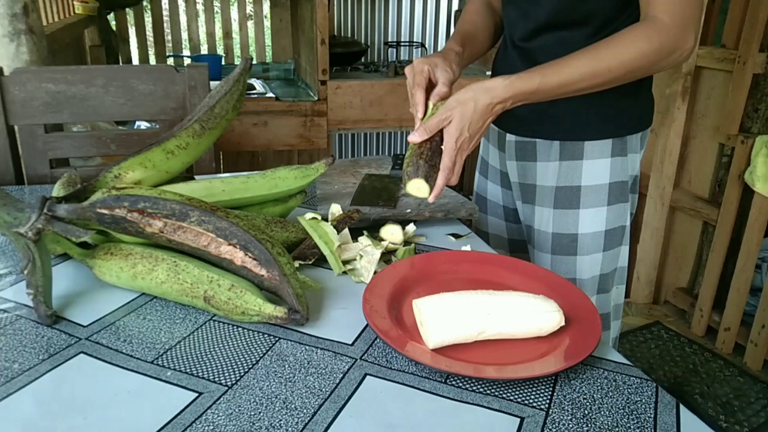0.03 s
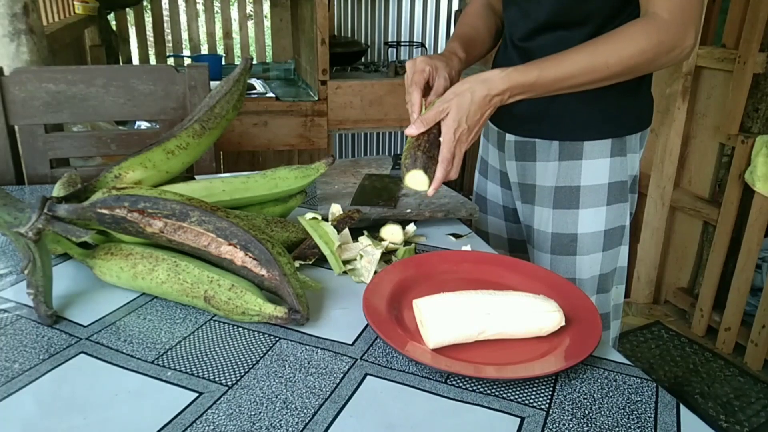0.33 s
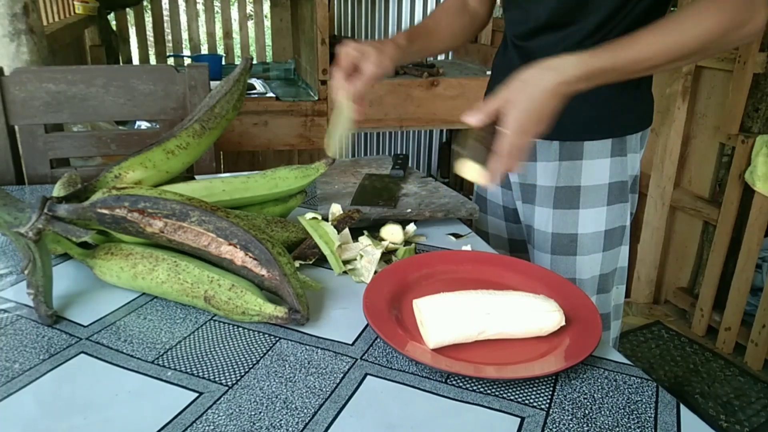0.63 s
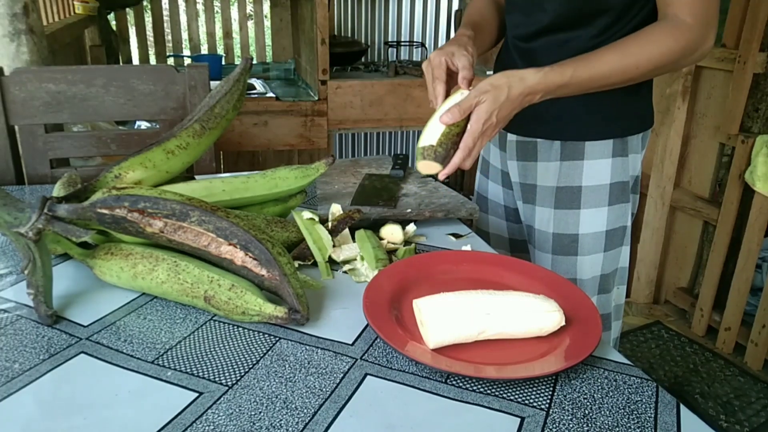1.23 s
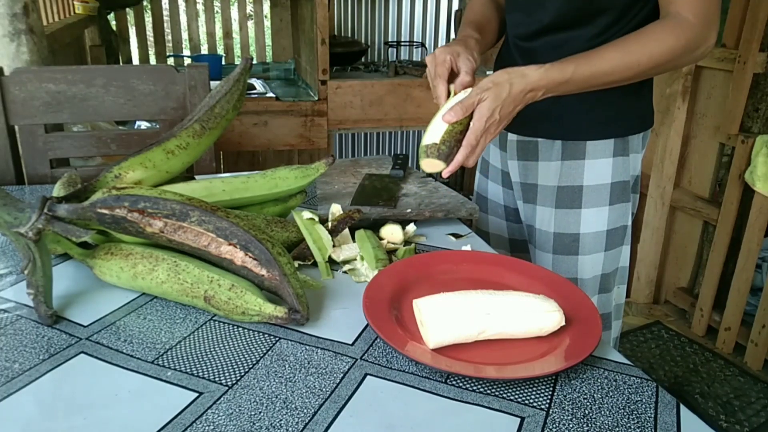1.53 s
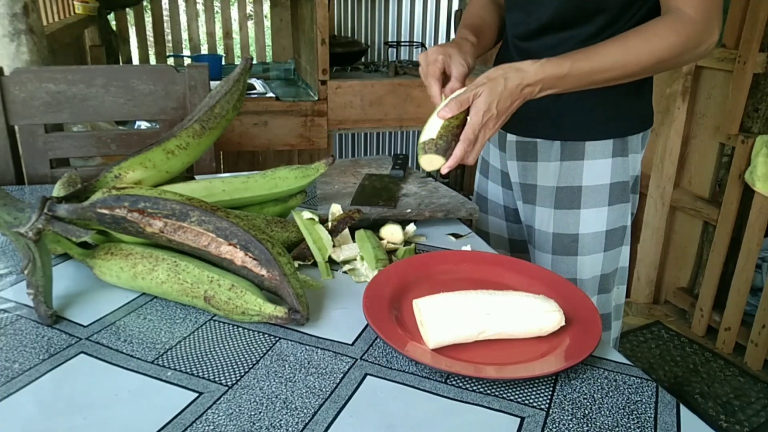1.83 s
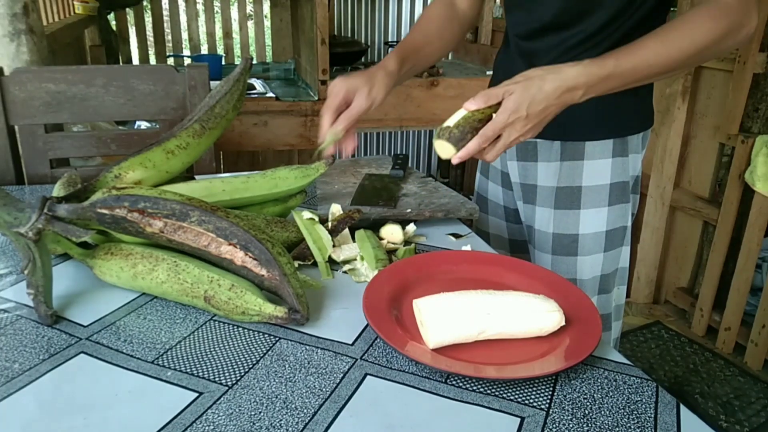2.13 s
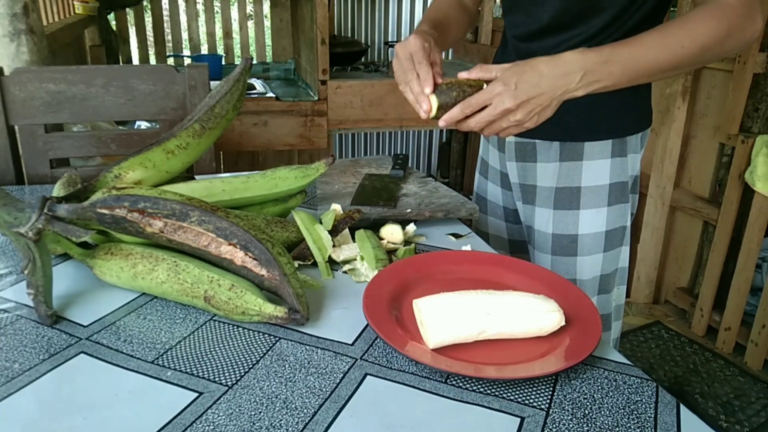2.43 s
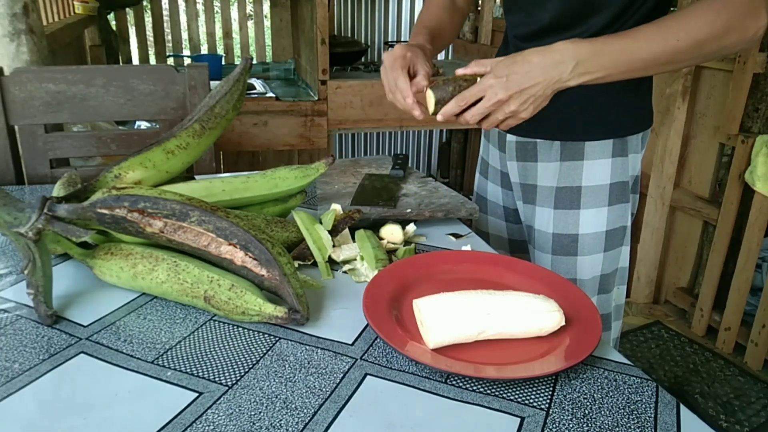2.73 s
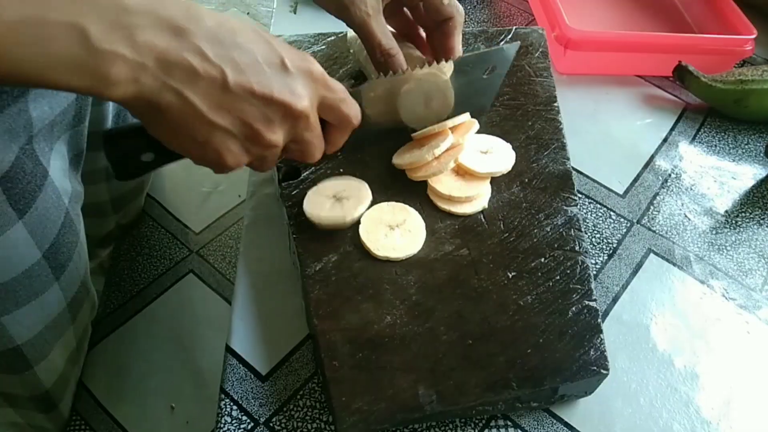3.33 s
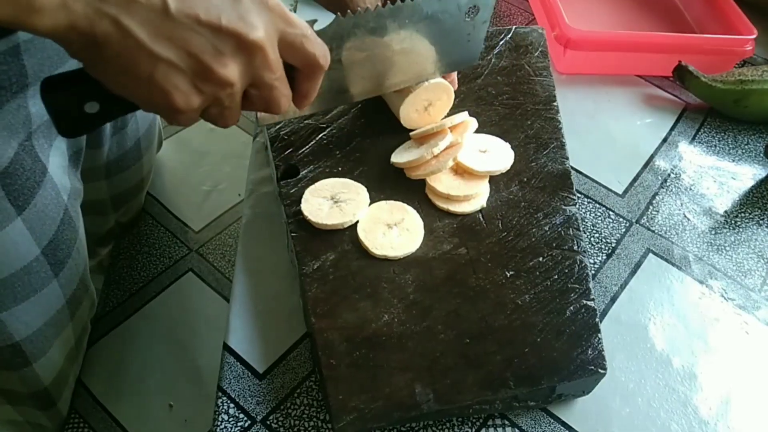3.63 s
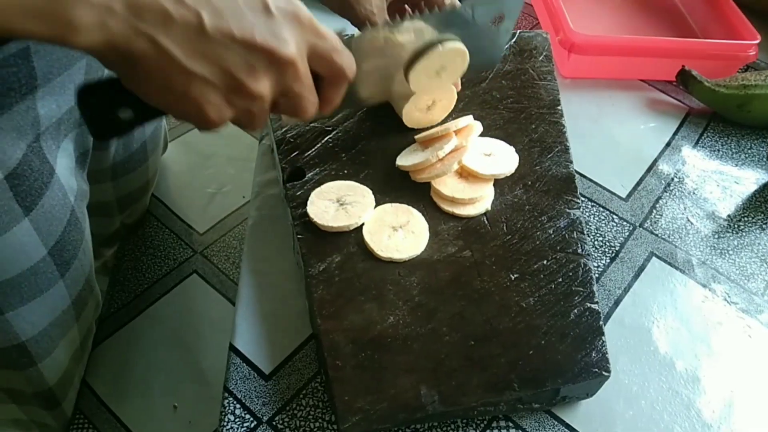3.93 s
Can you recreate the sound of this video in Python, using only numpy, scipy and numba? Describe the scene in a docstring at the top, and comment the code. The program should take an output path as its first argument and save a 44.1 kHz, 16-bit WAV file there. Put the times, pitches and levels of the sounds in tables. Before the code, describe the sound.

Plantain peel tearing off with a crackle, then two sharp knife knocks on a wooden board.

```python
"""Peeling and slicing a green plantain

At a table under an open shelter, hands tear off two strips of peel: fibres part in a dense crackle,
bundles snap, and the peel drops on the table. A cleaver then hisses through the fruit twice and
knocks on a wooden board, ringing its modes. Insects ring and small birds call in the trees around."""
import sys
import numpy as np
from scipy import signal
from scipy.fft import rfft, irfft
from scipy.io import wavfile
from scipy.ndimage import uniform_filter1d, minimum_filter1d
from numba import njit

SR = 44100
rng = np.random.default_rng(int(sys.argv[2]) if len(sys.argv) > 2 else 0)


def output_pcm(signal):
    """Save a mono or channel-first signal as 16-bit PCM at the path in sys.argv[1].

    Samples are clipped to [-1, 1] before scaling.
    """
    pcm = np.clip(np.atleast_2d(signal).T, -1, 1) * 32767
    wavfile.write(sys.argv[1], SR, np.round(pcm).astype(np.int16))


N = 176400
T = np.arange(N) / SR
ROOM_T60_S = .19


def peeling():
    """Fibres crackle apart, duller while the skin only strains; now and then a whole bundle snaps."""
    # per strip, rows of: t/s, level/dB, low edge/Hz, top edge/Hz
    tears = [
        [(.25, -64, 6300, 7500), (.39, -49.5, 5150, 7700), (.456, -51, 4600, 8700), (.475, -42.5, 1700, 15200),
         (.56, -43.5, 1100, 15200), (.65, -44.5, 780, 14900), (.667, -34.5, 520, 15900), (.68, -38, 320, 15000),
         (.70, -56, 397, 13900)],
        [(1.82, -64, 5960, 8900), (1.88, -51, 3150, 9100), (1.925, -44.5, 1940, 12700), (1.95, -43, 840, 15000),
         (2.02, -39.5, 480, 15000), (2.05, -75, 604, 12900), (2.10, -44, 620, 10900), (2.14, -54, 746, 10800),
         (2.165, -63, 800, 11000)],
    ]
    # snapping bundles: t/s, level/dB, rise and fade/s, low edge/Hz
    snaps = [(.331, -42, 0.00078, 5200), (0.567, -28, 0.00082, 2500), (0.615, -30, 0.0014, 2070),
             (0.647, -37, 0.0013, 705), (1.523, -27.5, 0.0047, 2880), (1.534, -37, 0.0096, 543),
             (1.911, -32, 0.00083, 3770), (1.946, -29, 0.0009, 2450), (1.957, -27, 0.00042, 2000),
             (2.075, -35.5, 0.0018, 1770), (2.146, -31, 0.0023, 970), (2.7361, -27.5, 0.0011, 4440),
             (2.746, -35.5, 0.011, 4170), (3.168, -54, .002, 3030), (3.236, -50.5, 0.0008, 2980),
             (3.297, -32, 0.0017, 2980)]
    # fibre spectrum: f/Hz, level/dB
    fibre_eq = [(200, -12), (1100, -4.5), (1600, -9.5), (2600, -6), (4000, -1.5), (5200, -2.5), (6500, 0),
                (8100, 7), (9500, -4), (12000, -12.5), (16000, -21.5)]
    out = np.zeros(N)
    for tear in tears:
        times_s, *columns = np.array(tear).T
        db, low_hz, top_hz = (np.interp(T, times_s, column) for column in columns)
        tearing = (T > times_s[0]) & (T < times_s[-1])
        crackle = ruptures(per_s=3900, spread_db=1.5) * undb(db) * tearing
        clump_db = 3 * band(45, 90)
        crackle = lowpass(lowpass(crackle * undb(clump_db), top_hz), top_hz)
        out += flap(crackle, low_hz)
    burst = lowpass(ruptures(per_s=20000, spread_db=1.6), 12500)
    for at_s, db, half_s, low_hz in snaps:
        out += flap(burst * undb(db) * swell(at_s, half_s, half_s), low_hz)
    return colour(out, fibre_eq)


def flap(x, edge_hz):
    """Loose peel radiates only above an edge; the longer the flap, the lower the edge."""
    for _ in range(3):
        x = highpass(x, edge_hz)
    return x


def cleaver():
    """Two strokes: the blade hisses through the flesh ever faster, then hits the board."""
    # strokes: t/s, ring level/dB, slicing time/s, slicing level/dB, contact/s, room/dB
    strokes = [(3.3214, -4, 0.051, -37, 0.00013, -5.5), (3.8543, -3, 0.09, -36.5, 0.00016, -13)]
    # slicing spectrum: f/Hz, level/dB
    slice_eq = [(60, 6), (200, 3.5), (420, -7.5), (700, -16), (1400, -3.5), (2500, -5.5), (4000, 0.5),
                (5500, -1), (7500, -4), (9800, -1), (11500, -21), (16000, -25)]
    rise_db = 19
    out = np.zeros(N)
    for at_s, ring_db, slice_s, slice_db, contact_s, room_db in strokes:
        knock = board_knock(at_s, ring_db, contact_s)
        uncut = np.clip((at_s - T) / slice_s, 0, 1)
        envelope = undb(slice_db - rise_db * uncut ** 2) * (uncut > 0) * (uncut < 1)
        hiss = colour(ruptures(per_s=9000, spread_db=5.5) * envelope, slice_eq)
        direct = knock + hiss
        out += direct + undb(room_db) * echoes(direct, ROOM_T60_S, damp_hz=3200)
    return out


def board_knock(at_s, ring_db, contact_s):
    """The blade cracks on the wood and both ring; longer contact dulls the knock."""
    # modes of board and blade: f/Hz
    modes_hz = [187, 349, 430, 844, 963, 1022, 1250, 1466, 1686, 2019, 2221, 2351, 2474, 2620, 2734, 3160,
                5250]
    # per mode: level/dB
    modes_db = [-16.5, -11.5, -14, -21.5, -13.5, -12.5, -16.5, -9, -14, -8.5, -16, -12, -6.5, -10.5, 2.5,
                -9, -5]
    # per mode: t60/s
    modes_t60_s = [.08, .075, .075, .07, .115, .1, .025, .055, .055, .04, .08, .08, .065, .05, .034, .03,
                   .007]
    crack_fade_s = .0036
    age_s = np.maximum(T - at_s, 0)
    ring = -sum(undb(db - 60 * age_s / t60_s) * np.cos(2 * np.pi * hz * age_s)
                for hz, db, t60_s in zip(modes_hz, modes_db, modes_t60_s)) * (T > at_s)
    # impact spectrum: f/Hz, level/dB
    crack_eq = [(100, -26), (700, -29), (1200, -1.5), (2700, 1), (3700, -6), (4500, -9), (5600, -4.5),
                (6500, -17.5), (8000, -10.5), (11000, -19.5), (16000, -25)]
    crack = colour(noise() * np.exp(-age_s / crack_fade_s) * (T > at_s), crack_eq)
    pole = np.exp(-2 / (contact_s * SR))
    knock = signal.lfilter([1 - pole], [1, -pole], undb(ring_db) * ring + crack)
    return lowpass(highpass(knock, 120), 12200)


def rubs():
    """Fingers scuff the peel: a hiss, a hollow body and a dull thud."""
    # scuffs: t/s, rise/s, fade/s, hiss/dB, body/dB, thud/dB
    scuffs = [(0.051, 0.0024, 0.019, -56, -79, -87), (0.9738, 0.0015, 0.024, -40.5, -58, -39.5),
              (2.478, 0.0018, 0.036, -67, -73, -78), (2.653, 0.0023, 0.021, -49.5, -46.5, -64),
              (2.675, 0.007, 0.032, -55, -50, -47.5), (3.043, 0.0039, .03, -69, -83, -57),
              (3.159, 0.003, .018, -43, -47, -43), (3.241, 0.01, 0.02, -63.5, -66, -51.5)]
    # hiss spectrum: f/Hz, level/dB
    hiss_eq = [(200, -20.5), (1200, -20.5), (2000, -4.5), (3200, -2.5), (5000, 4), (7500, 0.5),
               (10000, -11.5), (16000, -43)]
    # hollow body spectrum: f/Hz, level/dB
    body_eq = [(100, -17), (350, -1.5), (750, 1.5), (1300, -3.5), (2100, -12), (3200, -17.5), (8000, -46)]
    # thud spectrum: f/Hz, level/dB
    thud_eq = [(30, -33.5), (100, -4.5), (180, 2.5), (350, -15.5), (700, -25.5), (1500, -43), (5000, -64)]
    hiss_gain, body_gain, thud_gain = sum(undb(row[3:])[:, None] * swell(*row[:3]) for row in scuffs)
    hiss = colour(hiss_gain * ruptures(per_s=4700, spread_db=2.5), hiss_eq)
    body = colour(body_gain * ruptures(per_s=2900, spread_db=1.8), body_eq)
    return hiss + body + colour(thud_gain * noise(), thud_eq)


def bumps():
    """Peel and fruit bump softly, each time one damped tone of unsteady pitch."""
    # bumps: t/s, level/dB, f/Hz, t60/s, relative pitch wobble
    hits = [(.11, -60.5, 400, 0.094, 0.06), (0.973, -38.5, 356, 0.11, 0), (0.99, -36, 135, 0.29, 0.07),
            (.976, -34.5, 218, 0.11, 0.08), (2.32, -67.5, 184.3, 0.5, 0.37), (3.04, -49.5, 200, 0.16, 0.08),
            (2.471, -51.5, 838, 0.17, 0.16), (2.483, -57.5, 920, 0.26, 0.1)]
    rise_s = .0056
    out, wobble = np.zeros(N), band(73, 110)
    for at_s, db, hz, t60_s, depth in hits:
        age_s = np.maximum(T - at_s, 0)
        phase = 2 * np.pi * np.cumsum(hz * (1 + depth * wobble) * (T > at_s)) / SR
        envelope = undb(db - 60 * age_s / t60_s) * (1 - np.exp(-age_s / rise_s))
        out += envelope * np.sin(phase)
    return out


def hand_rumble():
    """Low rumble of hands at the board."""
    # envelope: t/s, level/dB
    levels = [(2.9, -100), (3.15, -71.5), (3.4, -56.5), (3.65, -66.5), (4.0, -57)]
    # rumble spectrum: f/Hz, level/dB
    rumble_eq = [(25, -16.5), (90, -1.5), (180, -2.5), (400, -11), (700, -24), (1500, -38.5), (5000, -43.5)]
    return colour(noise(), rumble_eq) * undb(np.interp(T, *np.array(levels).T))


def birds():
    """Near-level whistles and trilled glides, smeared by the trees."""
    # notes: t/s, length/s, start f/Hz, end f/Hz, level/dB
    notes = [(1.218, 0.062, 4600, 7000, -71), (1.265, 0.074, 7100, 4700, -55.5),
             (1.365, 0.022, 4300, 4900, -49), (1.379, 0.036, 6600, 4400, -51),
             (1.661, 0.032, 5600, 5550, -64), (1.751, 0.066, 4400, 6700, -55.5),
             (2.236, 0.095, 7600, 7250, -65), (2.602, 0.034, 2800, 2850, -65),
             (2.781, 0.18, 2936, 2474, -70), (2.802, 0.055, 4700, 5150, -58),
             (2.989, 0.048, 5700, 5950, -57), (3.002, .28, 2420, 2150, -72),
             (3.088, 0.035, 5500, 5000, -52.5), (3.484, 0.021, 2400, 2900, -51.5),
             (3.508, 0.13, 3900, 6700, -59), (3.55, 0.068, 4280, 5660, -65),
             (3.677, 0.08, 4950, 5050, -60.5), (3.921, 0.023, 5100, 5100, -44.5)]
    glide_share, pitch_share = .1, .012  # trill depths
    calls, trill = np.zeros(N), band(130, 150)
    for at_s, length_s, start_hz, end_hz, db in notes:
        on = (T >= at_s) & (T < at_s + length_s)
        progress = (T[on] - at_s) / length_s
        glide_hz = start_hz + (end_hz - start_hz) * (progress + glide_share * trill[on])
        hz = glide_hz * (1 + pitch_share * trill[on])
        envelope = undb(db) * np.sqrt(np.abs(np.sin(np.pi * progress)))
        calls[on] += envelope * np.sin(2 * np.pi * np.cumsum(hz) / SR)
    return undb(-4) * calls + undb(4.5) * echoes(calls, t60_s=.32, damp_hz=12000)


def insects():
    """A fluttering chorus in narrow bands, fainter from the first knock on."""
    # chorus bands: f/Hz, width/Hz, level/dB
    bands = [(7455, 140, -81), (7930, 110, -71.5), (8625, 170, -71.5), (8840, 120, -67), (11460, 180, -83)]
    drop_at_s, drop_db = 3.33, 10.5
    chorus = sum(undb(db) * band(hz, width_hz) for hz, width_hz, db in bands)
    flutter_db = 2 * band(9.1, 32)
    return chorus * undb(flutter_db - drop_db * (T > drop_at_s))


def air():
    """Faint, steady outdoor noise."""
    # air spectrum: f/Hz, level/dB
    air_eq = [(25, -7.5), (90, -0.5), (200, -8.5), (400, -15.5), (1000, -18.5), (3000, -24), (6000, -23.5),
              (10000, -30), (16000, -39.5)]
    return undb(-81) * colour(noise(), air_eq)


def echoes(x, t60_s, damp_hz, gap_s=.0035):
    """Diffuse reflections after a short gap."""
    t = T[:SR]
    tail = noise()[:SR] * undb(-60 * t / t60_s) * (t > gap_s)
    damping = signal.butter(1, damp_hz, fs=SR, output="sos")
    return signal.fftconvolve(x, signal.sosfilt(damping, tail / np.linalg.norm(tail)))[:N]


def ruptures(per_s, spread_db):
    """Tiny random clicks of uneven size, rms 1."""
    size = undb(spread_db * np.minimum(rng.exponential(size=N), 5))
    return unit((rng.random(N) < per_s / SR) * size * np.sign(noise()))


def swell(at_s, rise_s, fade_s):
    """Exponential rise to a moment and fade after it."""
    return np.exp(-np.maximum((at_s - T) / rise_s, (T - at_s) / fade_s))


def band(hz, width_hz):
    """Noise around one frequency, rms 1."""
    f = np.fft.rfftfreq(N, 1 / SR)
    return unit(irfft(rfft(noise()) * np.exp(-2 * ((f - hz) / width_hz) ** 2), N))


def colour(x, points):
    """Minimum-phase filter through (f/Hz, level/dB) points; keeps the power of white noise."""
    hz, db = np.array(points).T
    f = np.fft.rfftfreq(4096, 1 / SR)
    gain = undb(np.interp(np.log(f + 1), np.log(hz), db))
    cepstrum = irfft(np.log(gain))
    cepstrum[1:len(f) - 1] *= 2
    cepstrum[len(f):] = 0
    impulse = irfft(np.exp(rfft(cepstrum)))
    return signal.fftconvolve(x, impulse / np.linalg.norm(impulse))[:N]


@njit
def split(x, edge_hz):
    """State-variable filter with a moving edge; rows: low part, high part."""
    y, mid_state, low_state = np.empty((2, len(x))), 0., 0.
    for i in range(len(x)):
        g = np.tan(np.pi * edge_hz[i] / SR)
        mid = (mid_state + g * (x[i] + 1e-18 - low_state)) / (1 + g * (g + 1.2))
        low = low_state + g * mid
        y[0, i], y[1, i] = low, x[i] - 1.2 * mid - low
        mid_state, low_state = 2 * mid - mid_state, 2 * low - low_state
    return y


def lowpass(x, hz):
    return split(x, hz * np.ones(N))[0]


def highpass(x, hz):
    return split(x, hz * np.ones(N))[1]


def undb(db):
    return 10 ** (np.asarray(db) / 20)


def unit(x):
    return x / np.sqrt(np.mean(x ** 2))


def noise():
    return rng.standard_normal(N)


def scene():
    """Work under the shelter plus the outdoors, mono, after a brief silence."""
    start_s = .046
    hands = peeling() + rubs() + bumps() + hand_rumble()
    near = hands + undb(-6) * echoes(hands, ROOM_T60_S, damp_hz=7540) + cleaver()
    outdoors = birds() + insects() + air()
    return ((near + outdoors) * (T > start_s))[None]


def record(dry):
    """Fast peak limiter, then a steep treble cut."""
    top_hz = 16100
    needed_gain = 1 / np.maximum(np.abs(dry), 1)
    gain = uniform_filter1d(minimum_filter1d(needed_gain, size=65), size=33)
    return signal.sosfilt(signal.ellip(8, .2, 70, top_hz, fs=SR, output="sos"), dry * gain)


dry = scene()
out = record(dry)
output_pcm(out)
```